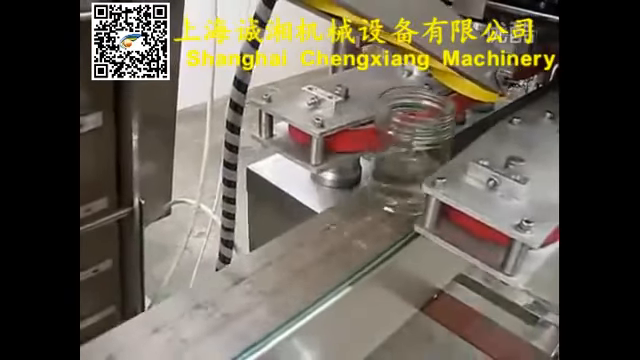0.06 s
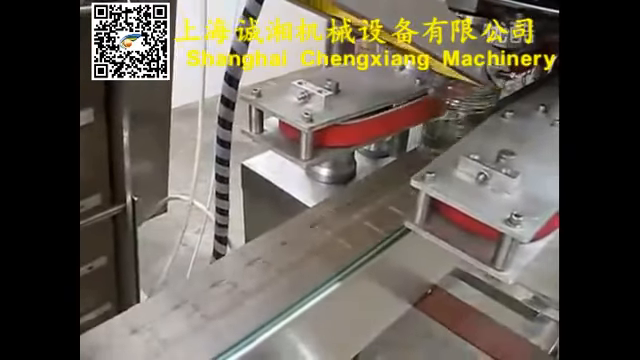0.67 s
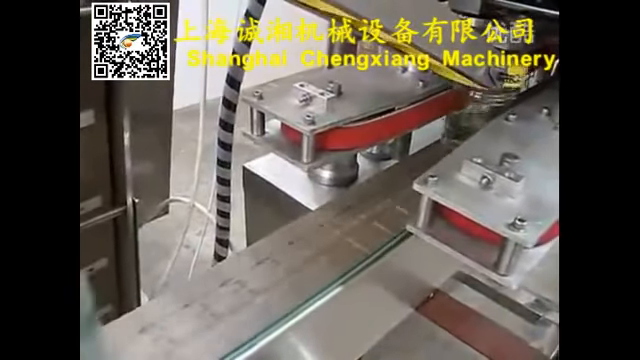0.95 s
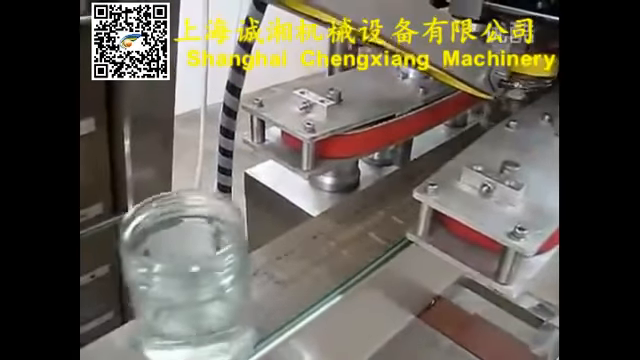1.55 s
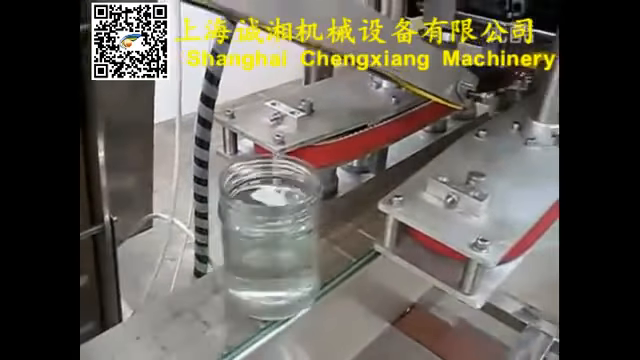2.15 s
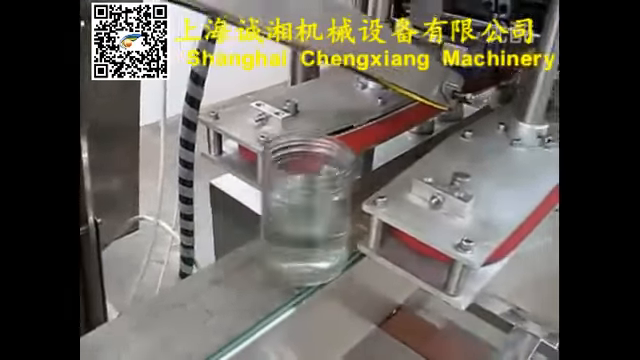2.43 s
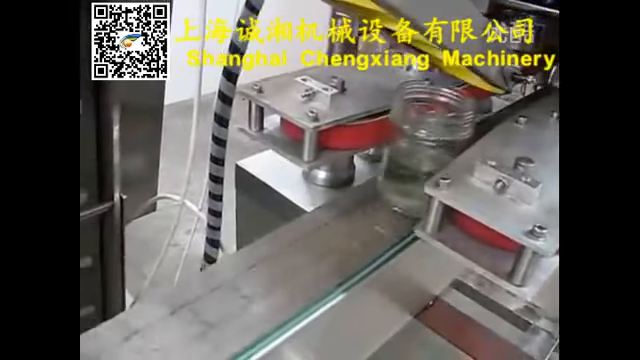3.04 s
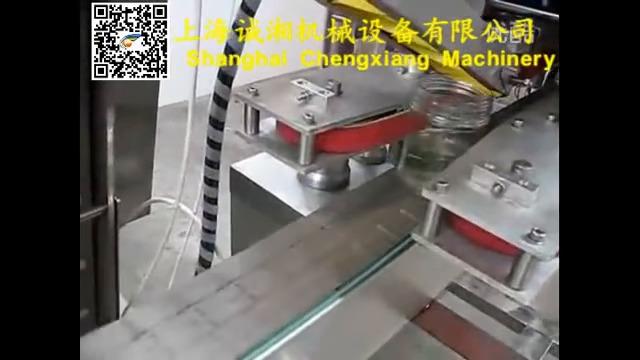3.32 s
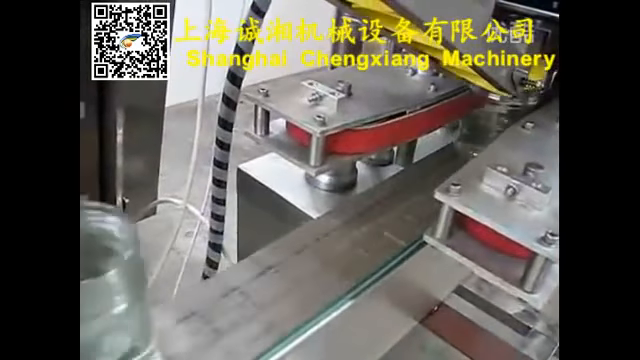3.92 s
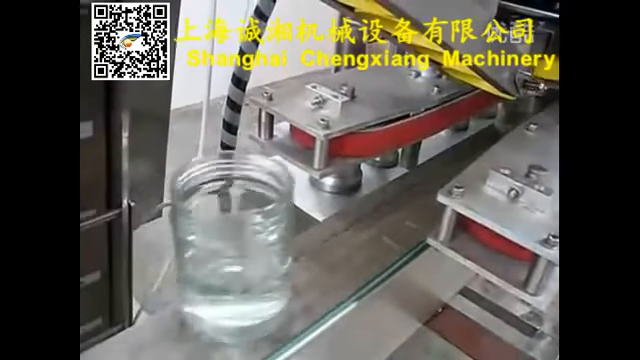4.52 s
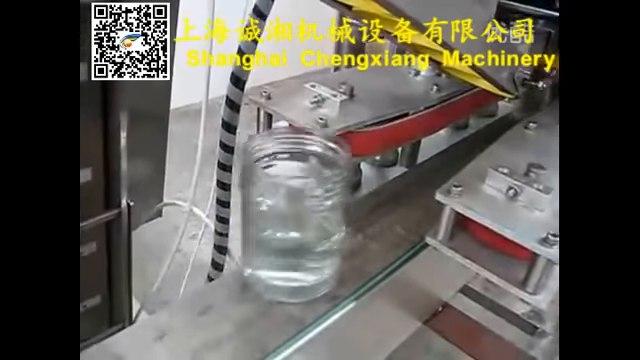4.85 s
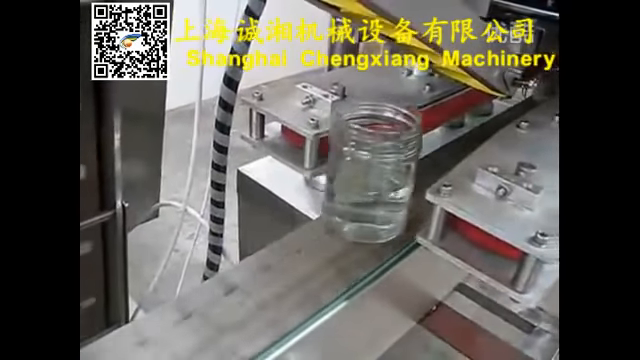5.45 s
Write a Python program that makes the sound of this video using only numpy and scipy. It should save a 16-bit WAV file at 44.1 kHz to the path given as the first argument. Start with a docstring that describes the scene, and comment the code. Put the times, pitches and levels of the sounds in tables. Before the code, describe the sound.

A conveyor and capping machine run loudly and close by in a factory hall. Throughout, a bright hiss of compressed air sits over a ticking, rattling steel chain, with lightly jiggling glass jars, rasping belts, a low rumble and a thin drive whine. The rattle has a hollow ring that fades at about 0.7 seconds. From 0.7 to 1 second a jar is capped in a quick burst of knocks, glassy clacks and spits of air, and the din dips briefly afterwards. Jars knock lightly on the guides at about 1.4 and 2.6 seconds. A second capping burst comes from 3.6 to 3.9 seconds, followed by another short dip. From about 4 seconds the belts squeal faintly. A few light jar knocks fall between 4.7 and 5.1 seconds, and the machinery keeps running to the end, at about 5.5 seconds.

```python
"""A hollow steel rattle under a bright hiss of compressed air: glass jars ride a conveyor in a factory hall.
The chain ticks and slides in its frame, the bed rumbles, belts rasp and drives whine. The hollow ring
of the guides fades as the first jar reaches the capping head. Twice a jar is capped in a burst of knocks,
glassy clacks and spits of air, and after each the din dips briefly. Jars also knock lightly on the
guides, and after the second capping the belts squeal faintly."""
import sys
import numpy as np
from scipy import signal
from scipy.fft import rfft, irfft
from scipy.io import wavfile
from scipy.ndimage import uniform_filter1d, map_coordinates

SR = 44100
rng = np.random.default_rng(int(sys.argv[2]) if len(sys.argv) > 2 else 0)


def master_out(mix):
    """Clip the mix to full scale and print it as 16-bit PCM to the path in sys.argv[1]."""
    frames = np.transpose(np.atleast_2d(mix))
    ceiling = np.clip(frames, -1, 1)
    pcm = np.round(ceiling * 32767).astype(np.int16)
    wavfile.write(sys.argv[1], SR, pcm)


N = 246078
TIME, FREQS = np.arange(N) / SR, np.fft.rfftfreq(N, 1 / SR)
FIRST_RELEASE_S, JAR_PERIOD_S = 0.97, 2.945  # when jars leave the capping head
HOLLOW_END_S, SQUEAL_START_S = 0.7, 4.04

# The dull body of a knock. Each row: resonance in Hz, width in Hz, level in dB.
KNOCK_MODES = [(820, 100, -3), (1020, 85, 5), (1390, 94, 1.5), (1900, 100, 1.5), (2290, 1100, -3)]
# The bright body of a clack. Each row: resonance in Hz, width in Hz, level in dB.
CLACK_MODES = [(2090, 200, 5), (2350, 200, 5), (3030, 200, 2), (3880, 180, 0.5), (4850, 350, -0.5),
               (8850, 250, 4)]
# Jars hitting the head and guides. Each row: start in seconds, knock, clack, glass ring and air spit
# levels in dB, spit centre in Hz, decay in seconds, snap level in dB, snap pitch in Hz,
# crack level in dB, nudge to the din in dB.
JAR_BLOWS = [ (.695, -22, -14, -21, -6, 12150, 0.0035, -8, 2210, -4, -3),
             (.766, -34, -23, -36, -9, 11970, .0043, -24, 3800, 1, -1),
             (.877, -18, -28, -42, -23, 11480, .005, -8.5, 900, -3, -1.5),
             (.896, -27, -35, -45, -30, 11380, .007, -9, 1060, -12, -.5),
             (.957, -29, -26, -45, -12.5, 12700, 0.01, -26, 4900, -8, 0),
             (.976, -32, -19, -25, -13.5, 9960, 0.0065, -7.5, 2800, 2, 0),
             (1.366, -27, -30, -34, -32, 12000, .008, -13, 1015, -14, 0.5),
             (2.642, -22, -26, -36, -32, 12000, .005, -12, 1980, -12, 0.5),
             (3.572, -12, -25, -30, -23, 11900, 0.0054, -6, 1900, -4, .5),
             (3.582, -16, -28, -35, -28, 12000, 0.0068, -11, 940, -12, -1),
             (3.627, -16, -21, -28, -19, 12000, .005, -9, 2190, -2, -1.5),
             (3.736, -28, -24, -26, -14, 11250, .011, -15, 2500, -1, -3.5),
             (3.818, -35, -18, -19.5, -12, 12440, 0.0042, -5.5, 2600, -7, -1.5),
             (3.899, -42, -23, -35, -10.5, 13100, 0.0075, -26, 3750, -4, -2),
             (3.925, -33, -15, -39, -21, 8900, 0.007, -11.5, 3880, -5, -1.5),
             (4.680, -32, -25, -44, -32, 12000, .004, -21, 2250, -12, 1),
             (4.763, -24, -27, -42, -32, 12000, .006, -19, 2090, -14, 0.5),
             (4.936, -23, -28, -42, -32, 12000, .005, -18, 1900, -14, -1),
             (5.087, -20, -25, -38, -32, 12000, .0059, -12, 2600, -12, 0)]
def capper(rise_s=0.0013, hall_db=-26, hall_t60=0.41, spit_width_hz=1600):
    """Jars hit the head and guides: a knock, a clack, ringing glass and a spit of air, with a hall tail."""
    envelopes = np.zeros((3, N))
    spit_hz = np.full(N, JAR_BLOWS[0][5])
    for start, knock_db, clack_db, _, spit_db, centre_hz, decay_s, *_ in JAR_BLOWS:
        sounding, age = blow_window(start)
        attack = 1 - np.exp(-age / rise_s)
        direct = np.exp(-(age / decay_s) ** 2 / 2)
        hall = gain_of(hall_db - 60 * age / hall_t60)
        envelope = attack * np.hypot(direct, hall)
        envelopes[:, sounding] += gain_of([[knock_db], [clack_db], [spit_db]]) * envelope
        spit_hz[sounding] = centre_hz
    knock, clack, spit = envelopes
    scrape, hiss = scuffs()
    dulling = np.sqrt(1 - high_pass(3000) ** 2)
    knocks = (knock + scrape) * noise(ringing(KNOCK_MODES) * high_pass(530) * dulling)
    clacks = clack * noise(ringing(CLACK_MODES) * high_pass(1550))
    spits = spit * noise_band(spit_hz, spit_width_hz, steepness=2.8)
    return knocks + clacks + glass_ring() + spits + hiss


def cracks(delay_s=0.002, rebound_s=0.0017, loss_db=-4, contacts=3):
    """Glass meets steel in each blow: one hard, bright crack and quick, weaker rebounds."""
    train = np.zeros(N)
    for start, *_, crack_db, _ in JAR_BLOWS:
        gaps = rebound_s * rng.uniform(.5, 1.5, contacts)
        at = np.round((start + delay_s + np.cumsum(gaps) - gaps[0]) * SR).astype(int)
        train[at] += gain_of(crack_db + loss_db * np.arange(contacts)) * rng.choice([-1, 1], contacts)
    presence = gain_of(5 / (1 + ((FREQS - 3400) / 1500) ** 2))
    return filtered(train, high_pass(1500, order=2) * presence)


# The partials of a jar. Each row: pitch in Hz, level in dB, time to fade by 60 dB in seconds.
GLASS_MODES = [(2205, -4.5, 0.31), (2300, 1, 0.14), (2475, -1, 0.22), (3870, -4, 0.18), (5040, -1, 0.076),
               (5190, -1.5, 0.09), (5350, -3, 0.05)]
def glass_ring(snap_delay_s=0.001836, snap_t60=0.01):
    """Each blow sets the jar ringing and adds a short, pitched snap."""
    glass = np.zeros(N)
    for start, _, _, ring_db, _, _, _, snap_db, snap_hz, *_ in JAR_BLOWS:
        sounding, age = blow_window(start)
        glass[sounding] += sum(gain_of(ring_db + db) * ping(age, hz, t60) for hz, db, t60 in GLASS_MODES)
        snap_age = np.maximum(age - snap_delay_s, 0)
        glass[sounding] += gain_of(snap_db) * ping(snap_age, snap_hz, snap_t60)
    return filtered(glass, high_pass(500))


# Jars brushing the guides. Each row: midpoint in seconds, half length in seconds, scrape level in dB,
# hiss level in dB, hiss centre in Hz.
GUIDE_SCUFFS = [(0.655, 0.036, -34, -25, 6700), (0.725, 0.08, -25, -42, 13100),
                (0.875, 0.057, -20.5, -35, 13100), (3.69, 0.035, -24, -40, 13100),
                (3.894, 0.034, -31, -18, 13270), (3.96, 0.047, -47, -19, 13070),
                (4.131, 0.044, -27, -42, 13100), (5.137, 0.05, -28, -38, 13100)]
def scuffs():
    """A jar slides along the guides: returns the envelope of its low scrape, and its hiss as sound."""
    scrape, hiss = np.zeros((2, N))
    for middle, half_s, scrape_db, hiss_db, hiss_hz in GUIDE_SCUFFS:
        contact = np.exp(-((TIME - middle) / half_s) ** 2)
        scrape += gain_of(scrape_db) * contact
        hiss += gain_of(hiss_db) * contact * noise_band(hiss_hz, 0.12 * hiss_hz, steepness=3)
    return scrape, hiss


# The tone of the air jet. Each row: frequency in Hz, level in dB.
AIR_SPECTRUM = [(300, -39), (3000, -23), (7000, -49.5), (8100, -8.5), (8400, -5), (9400, -4), (10400, -1),
                (11200, 2), (12300, 4.5), (13700, 3), (14100, -1), (15000, -2)]
def air_jet(level_db=-17.5, sputter_db=1.02, splits_hz=(10800, 12800)):
    """Compressed air hisses, duller at first and behind a passing jar; three bands sputter separately."""
    jet = colour(grains(per_s=1500, share=0.062), shape(AIR_SPECTRUM))
    tilt_db = -1.8 + 2.4 * settled() - passing()
    hiss = np.zeros(N)
    for k in range(3):
        band = filtered(jet, np.digitize(FREQS, splits_hz) == k)
        hiss += band * gain_of((k - 1) * tilt_db + sputter_db * waver(rate_hz=32))
    motion_db = 0.5 * swell(slow_hz=2.5, fast_hz=9.8) - 0.6 * waver(rate_hz=78)
    return hiss * gain_of(level_db - 0.5 * (1 - settled()) + motion_db)


# The tone of the chain's rattle. Each row: frequency in Hz, level in dB.
RATTLE_SPECTRUM = [(250, -39), (500, -4), (750, 1.5), (1100, -2.5), (1620, 0.5), (2250, 2), (2800, 2.5),
                   (3400, 1.5), (4100, 0), (5700, 0), (6400, 1), (7450, -0.5), (7800, -8), (11000, -44)]
# The ring of the steel frame. Each row: resonance in Hz, width in Hz, boost or cut in dB.
FRAME_MODES = [(913, 31, 8), (1101, 48, 10.5), (1400, 190, 3), (1650, 140, -1.5)]
# The hollow ring of the guides. Each row: resonance in Hz, width in Hz, level in dB.
GUIDE_MODES = [(1075, 117, 5), (1342, 160, 6), (1731, 84, 2.5), (2240, 190, -2), (2580, 79, 3.5),
               (3110, 190, -1), (3497, 214, 5), (3800, 60, 0.5), (4040, 77, 2.5), (4236, 61, 4.5),
               (4700, 450, -2.5), (6500, 540, 0.7), (7040, 2700, -2)]
def chain(level_db=-23, guides_db=3.5, hollow_start=0.74, hollow_later=0.044):
    """Chain links tick and slide, ringing mostly the hollow guides at first and then the frame."""
    rattle_tone = shape(RATTLE_SPECTRUM)
    frame_db = sum(db / (1 + (2 * (FREQS - hz) / width) ** 2) for hz, width, db in FRAME_MODES)
    frame = colour(grains(per_s=2000, share=0.19), rattle_tone * gain_of(frame_db))
    guides = colour(grains(per_s=2000, share=0.28), rattle_tone * ringing(GUIDE_MODES, skirt=1.6))
    hollow = hollow_start + (hollow_later - hollow_start) * settled()
    rattle = np.sqrt(1 - hollow) * frame + np.sqrt(hollow) * gain_of(guides_db) * guides
    load_db = 1.8 * passing() - 0.5 * gripped() - 1.04 * squealing()
    motion_db = 0.58 * swell() + 0.42 * waver(rate_hz=100)
    return rattle * gain_of(level_db + load_db + motion_db)


# The tone of the chain's stray ticks. Each row: frequency in Hz, gain in dB.
TICK_SPECTRUM = [(700, -15.5), (2000, -1.5), (4000, -4.5), (5500, -12), (8000, -15), (10000, 0), (12500, 2),
                 (15000, 2.5)]
def chain_ticks(per_s=420, level_db=-8):
    """Stray, needle-sharp ticks of the chain stick out of the din."""
    return gain_of(level_db) * filtered(impacts(per_s), shape(TICK_SPECTRUM))


def clinks(per_s=140, t60=0.084, level_db=-32, start_db=-6, pitches=36):
    """Jars jiggle on the steel chain: each small contact rings briefly at one of many pitches."""
    age = TIME[:SR // 5]
    jingle = np.zeros(N)
    for hz in np.geomspace(850, 3700, pitches) * rng.uniform(.98, 1.02, pitches):
        contacts = rng.random(N) < per_s / pitches / SR
        force = gain_of(3 * np.minimum(rng.exponential(1, N), 2))
        jingle += signal.oaconvolve(contacts * force, ping(age, hz, t60))[:N]
    return gain_of(level_db + start_db * (1 - settled())) * colour(jingle, high_pass(580))


# The belts' rub, shifting with their grip. Each row: time in seconds, centre in Hz, level in dB.
RUB_CURVE = [(.72, 2073, -33), (1.1, 2038, -34), (1.35, 2000, -30.5), (1.55, 1998, -36.5),
             (1.95, 2020, -35), (2.3, 2027, -43), (2.64, 2038, -37), (2.96, 1980, -35), (3.27, 1985, -33),
             (3.55, 1958, -38), (4.15, 1884, -35.5), (4.6, 1832, -37.5), (5.5, 1803, -33)]
# Their higher rasp, coming and going. Each row: time in seconds, centre in Hz, level in dB.
RASP_CURVE = [(.5, 3540, -35), (.63, 3580, -27), (.7, 3580, -32), (.76, 3600, -25), (.86, 3560, -35),
              (1.1, 3545, -32.5), (1.35, 3520, -28.5), (1.47, 3520, -37), (1.58, 3515, -29),
              (1.75, 3500, -37), (2.05, 3600, -36), (2.28, 3440, -29), (2.5, 3680, -40), (2.66, 3540, -37),
              (2.82, 3620, -46), (3.08, 3680, -33), (3.4, 3620, -37), (3.751, 3660, -37), (4.1, 3600, -29),
              (4.35, 3580, -35), (4.55, 3570, -39), (4.85, 3420, -42), (5.45, 3400, -37)]
# Their faint squeal. Each row: resonance in Hz, width in Hz, level in dB.
SQUEAL_MODES = [(1809, 60, 6.5), (2070, 300, -1), (3170, 240, -1.5), (4373, 110, 0), (6350, 340, -1),
                (6830, 240, 2.5), (7500, 360, 1), (9460, 730, -2.5)]
def belts(rub_width_hz=70, rasp_width_hz=145, wander=0.011, squeal_db=-28.5):
    """The belts rub and rasp in two drifting resonances; after the second jar they also squeal."""
    squeal = noise(ringing(SQUEAL_MODES, skirt=1.55))
    friction = squealing() * squeal * gain_of(squeal_db + 2.5 * waver(rate_hz=16))
    for curve, width_hz in ((RUB_CURVE, rub_width_hz), (RASP_CURVE, rasp_width_hz)):
        when, hz, db = np.transpose(curve)
        centre_hz = np.interp(TIME, when, hz) * (1 + wander * swell())
        friction += gain_of(np.interp(TIME, when, db)) * noise_band(centre_hz, width_hz, steepness=2.5)
    return friction


# The tone of the conveyor bed. Each row: frequency in Hz, level in dB.
BED_SPECTRUM = [(20, -10), (70, -10), (125, -11), (195, -4.5), (260, -4.5), (380, 1.5), (520, 2),
                (750, -0.5), (1400, -48)]
# Its dull bumps. Each row: start in seconds, centre in Hz, level in dB, swell time in seconds.
BED_BUMPS = [(.585, 1003, -28.5, 0.018), (.882, 900, -23, .012), (1.355, 1007, -30, .014),
             (2.511, 201, -40, .026), (2.635, 197.7, -37.5, 0.029), (3.51, 178, -42, .03),
             (4.755, 676, -27, 0.0096), (5.04, 775, -26, 0.011)]
def conveyor_bed(level_db=-39.5, start_db=-11, pass_db=3, deep_hz=165, growth_db_per_s=1.04):
    """The bed drones and bumps, quiet at first and louder under a passing jar; its low end slowly grows."""
    drone = noise(shape(BED_SPECTRUM))
    upper = filtered(drone, high_pass(deep_hz) ** 2)
    deep_db = -4 + growth_db_per_s * TIME + 2.8 * swell(slow_hz=2.5, fast_hz=11)
    bed = upper + (drone - upper) * gain_of(deep_db)
    quiet = 1 - step(TIME - HOLLOW_END_S, fade_s=0.34)
    bed *= gain_of(level_db + start_db * quiet + pass_db * passing() + 1.54 * swell())
    for start, hz, db, swell_s in BED_BUMPS:
        bed += gain_of(db) * hump(start, swell_s) * noise_band(hz, 0.13 * hz, steepness=1.66)
    return bed


# The whine of the drives. Each row: pitch in Hz, rms level in dB.
DRIVE_TONES = [(781, -47.5), (1190.4, -50.5), (5604, -60), (6014, -58), (10428, -57)]
def drives(wobble=0.00037, waver_db=1.5):
    """Thin gear whines waver together in pitch and separately in level."""
    drive_time = np.cumsum(1 + wobble * waver(rate_hz=9.4)) / SR
    whine = np.zeros(N)
    for hz, db in DRIVE_TONES:
        peak = np.sqrt(2) * gain_of(db + waver_db * waver(rate_hz=4.5))
        whine += peak * np.sin(2 * np.pi * hz * drive_time)
    return whine


def panel_echoes(x, echo_db=-20, drift_s=0.000238, count=6):
    """Steel panels and passing jars throw back short, drifting echoes: a fine comb wanders over the din."""
    echoed = x.copy()
    for delay_s, rate_hz, phase in rng.uniform([.003, .12, 0], [.018, .3, 1], (count, 3)):
        lag = delay_s + drift_s * np.sin(2 * np.pi * (rate_hz * TIME + phase))
        echoed += gain_of(echo_db) * map_coordinates(x, [(TIME - lag) * SR], order=2, mode="wrap")
    return echoed / np.sqrt(1 + count * gain_of(echo_db) ** 2)


def flicker(x, centre_hz=8000, width_hz=330, depth_db=4.5, mean_db=-1):
    """A narrow band of the hiss flickers quickly."""
    band = filtered(x, np.exp(-((FREQS - centre_hz) / width_hz) ** 2))
    return x + band * (gain_of(mean_db + depth_db * swell(slow_hz=5.8, fast_hz=22.3)) - 1)


def blow_dips(peak_s=0.031):
    """Gain of the din: it dips for a moment after many blows and lifts slightly after a few."""
    return gain_of(sum(db * hump(start, peak_s) ** 3 for start, *_, db in JAR_BLOWS))


def lull(x, fall_s=0.025, hold_s=0.083, recover_s=0.071):
    """After each capping the bass drops out briefly, the middle sags and the treble hardly moves."""
    age = since_release()
    onset = np.clip(age / fall_s, 0, 1)
    dip = (onset * np.exp(-np.maximum(age - hold_s, 0) / recover_s)).sum(0)
    above_bass, treble = (filtered(x, high_pass(hz) ** 2) for hz in (270, 7500))
    bass, middle = x - above_bass, above_bass - treble
    return bass * gain_of(-42 * dip ** 2) + middle * gain_of(-5 * dip) + treble * gain_of(-1.3 * dip)


def since_release():
    """Seconds since each of three successive jars leaves the capping head, one row per jar."""
    return TIME - (FIRST_RELEASE_S + JAR_PERIOD_S * np.arange(3))[:, None]


def passing(lead_s=1.39, half_s=0.22):
    """0 to 1: how near a jar is as it rides past on its way to the head."""
    return np.exp(-((since_release() + lead_s) / half_s) ** 2).sum(0)


def gripped(grip_s=0.21, close_s=0.03, open_s=0.075):
    """0 to 1: a jar is held in the belts, its weight off the chain."""
    age = since_release()
    return (step(age + grip_s, close_s) * (1 - step(age - open_s, open_s))).sum(0)


def settled():
    """0 while the guides ring hollow, 1 afterwards."""
    return step(TIME - HOLLOW_END_S, fade_s=0.031)


def squealing():
    """0 until the belts begin to squeal, 1 afterwards."""
    return step(TIME - SQUEAL_START_S, fade_s=0.015)


def blow_window(start, length_s=0.5):
    """The samples a blow sounds in, and their age in seconds."""
    sounding = (TIME >= start) & (TIME < start + length_s)
    return sounding, TIME[sounding] - start


def step(age, fade_s):
    """Rises smoothly from 0 to 1 as age passes zero."""
    return .5 + .5 * np.tanh(age / fade_s)


def hump(start, peak_s):
    """Swells to 1 in peak_s, then dies away."""
    age = np.maximum(TIME - start, 0) / peak_s
    return age * np.exp(1 - age)


def ping(age, hz, t60):
    """A struck partial that fades by 60 dB in t60 seconds."""
    return gain_of(-60 * age / t60) * np.sin(2 * np.pi * hz * age)


def impacts(per_s):
    """Random clicks of uneven size."""
    return rng.standard_normal(N) * (rng.random(N) < per_s / SR)


def grains(per_s, share):
    """Tiny impacts, carrying a share of the power, over smooth friction noise."""
    return np.sqrt(share) * unit_rms(impacts(per_s)) + np.sqrt(1 - share) * rng.standard_normal(N)


def noise(gains):
    """Coloured noise of rms 1."""
    return colour(rng.standard_normal(N), gains)


def noise_band(hz, width_hz, steepness):
    """Noise of rms 1 around a steady or moving centre."""
    phase = 2 * np.pi * np.cumsum(np.broadcast_to(hz, N)) / SR
    band = 1 / (1 + (FREQS / width_hz) ** steepness)
    return noise(band) * np.cos(phase) + noise(band) * np.sin(phase)


def waver(rate_hz):
    """Random motion of rms 1, from a few times a second up to the rate."""
    return noise(high_pass(4, order=2) / (1 + (FREQS / rate_hz) ** 2))


def swell(slow_hz=.8, fast_hz=7):
    """Slow random motion of rms 1."""
    rates = np.geomspace(slow_hz, fast_hz, 24)
    return unit_rms(sum(np.sin(2 * np.pi * (hz * TIME + rng.random())) for hz in rates))


def shape(points):
    """EQ curve through points of Hz and dB."""
    hz, db = np.transpose(points)
    return gain_of(np.interp(np.log(FREQS + 1), np.log(hz), db))


def ringing(modes, skirt=1):
    """EQ curve of a set of resonances; a higher skirt deepens the valleys between them."""
    power = 0
    for hz, width, db in modes:
        detuning = (FREQS ** 2 - hz ** 2) / (width * FREQS + 1)
        power += gain_of(db) ** 2 / (1 + detuning ** 2) ** skirt
    return np.sqrt(power)


def high_pass(hz, order=6):
    """EQ curve of a smooth high-pass."""
    return 1 / np.sqrt(1 + (hz / (FREQS + 1)) ** order)


def filtered(x, gains):
    """Applies an EQ curve."""
    return irfft(rfft(x) * gains, N)


def colour(x, gains):
    """Applies an EQ curve and scales to rms 1."""
    return unit_rms(filtered(x, gains))


def unit_rms(x):
    """Scales to rms 1."""
    return x / np.sqrt(np.mean(x ** 2) + 1e-20)


def gain_of(db):
    """Decibels to amplitude."""
    return 10 ** (np.asarray(db) / 20)


def scene():
    """The jars' blows over the din of the running line, the same in both channels."""
    bed = conveyor_bed()
    machinery = chain() + clinks() + chain_ticks() + belts() + air_jet()
    din = bed + flicker(panel_echoes(machinery)) + drives()
    mix = lull(din * blow_dips()) + capper() + cracks()
    return np.array([mix, mix])


def record(dry, threshold_db=-8, duck_db_per_db=2.25, attack_s=0.005, recovery_db_per_s=120):
    """A limiter ducks the mix after loud blows, peaks are rounded and the very top is cut."""
    power = uniform_filter1d((dry ** 2).mean(0), size=200)
    power_db = 10 * np.log10(abs(power) + 1e-12)
    fall_db = TIME * recovery_db_per_s
    held_db = np.maximum.accumulate(power_db + fall_db) - fall_db
    over_db = np.maximum(held_db - threshold_db, 0)
    pole = np.exp(-1 / (attack_s * SR))
    ducked = dry / gain_of(duck_db_per_db * signal.lfilter([1 - pole], [1, -pole], over_db))
    rounded = ducked / (1 + (ducked / .93) ** 8) ** (1 / 8)
    low_pass = signal.firwin(801, cutoff=14920, window=("kaiser", 9), fs=SR)
    return signal.oaconvolve(rounded, low_pass[None], "same")


dry = scene()
out = record(dry)
master_out(out)
```